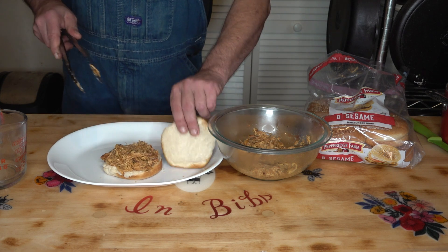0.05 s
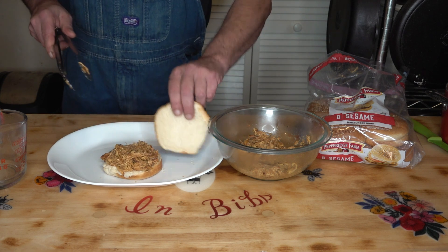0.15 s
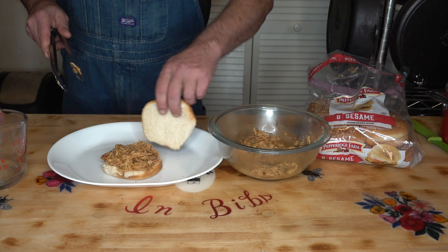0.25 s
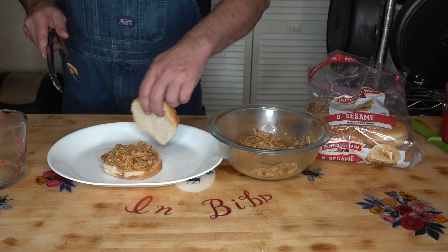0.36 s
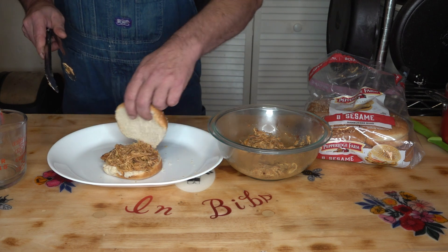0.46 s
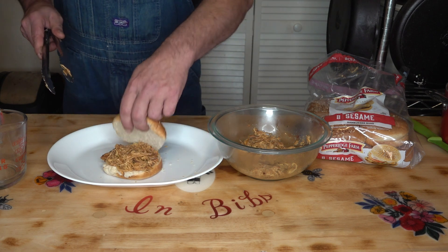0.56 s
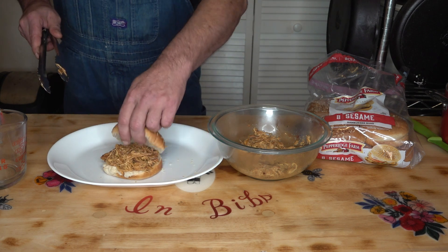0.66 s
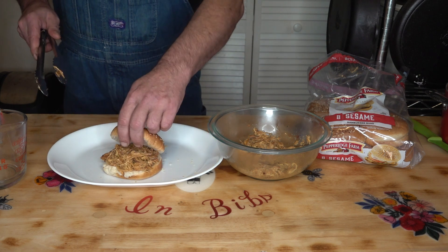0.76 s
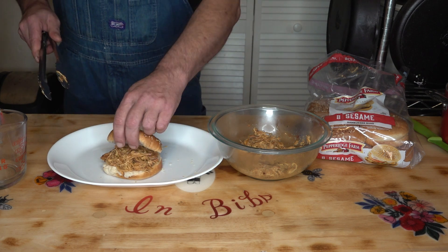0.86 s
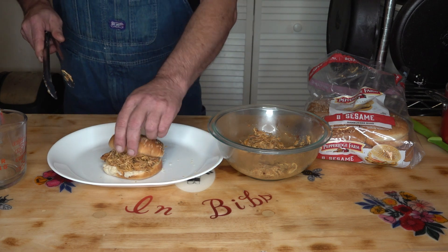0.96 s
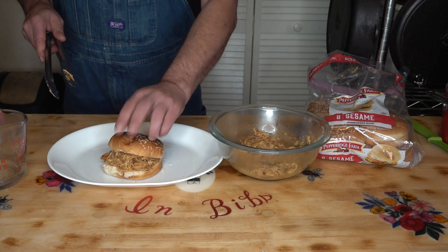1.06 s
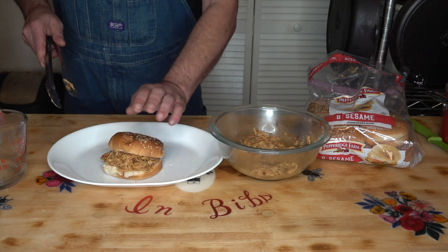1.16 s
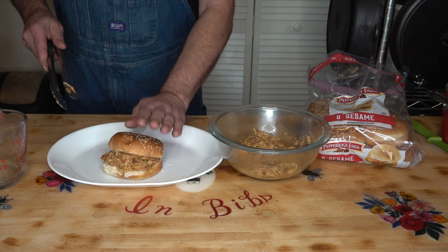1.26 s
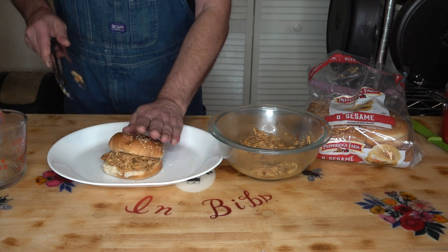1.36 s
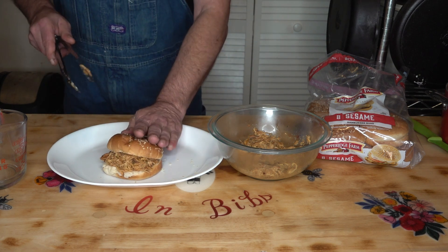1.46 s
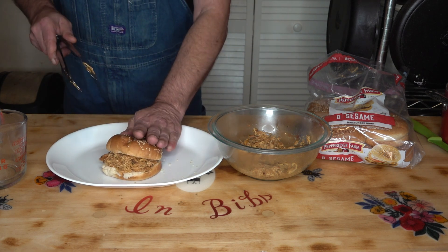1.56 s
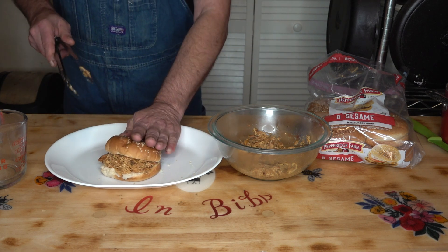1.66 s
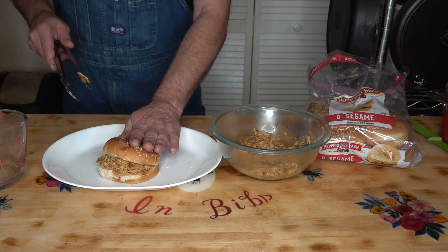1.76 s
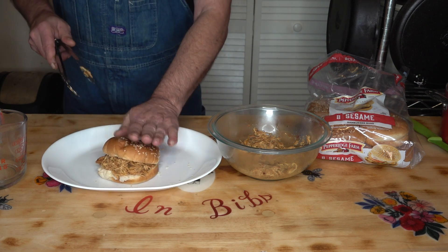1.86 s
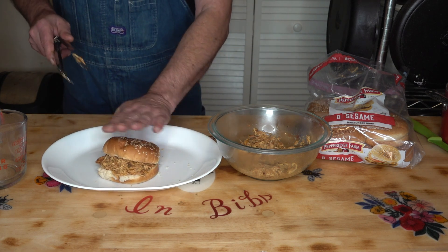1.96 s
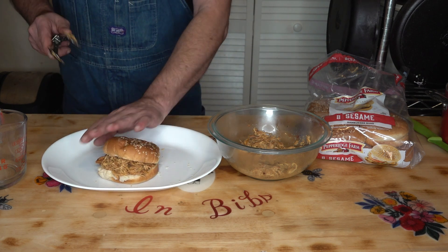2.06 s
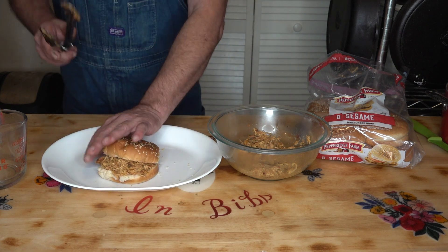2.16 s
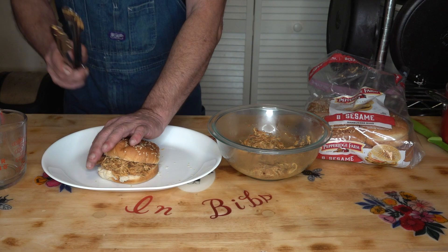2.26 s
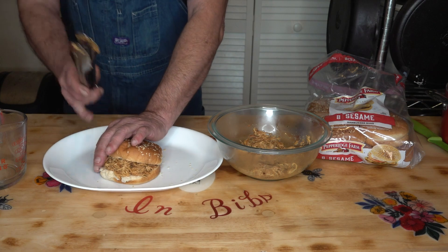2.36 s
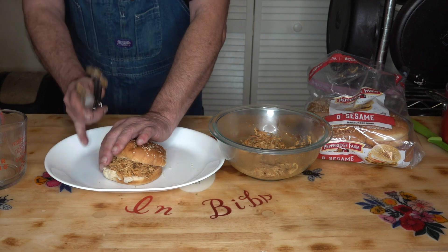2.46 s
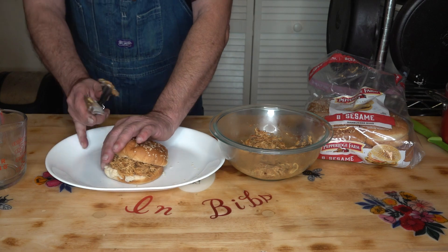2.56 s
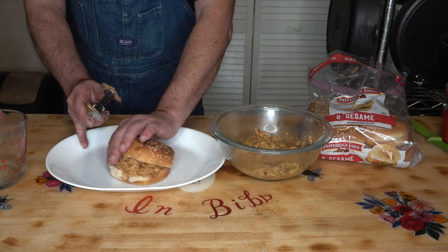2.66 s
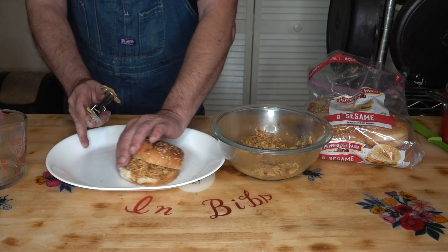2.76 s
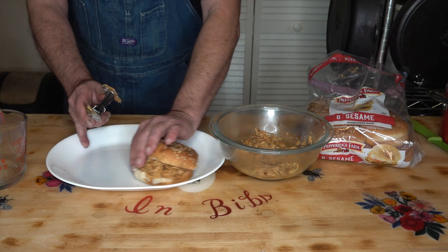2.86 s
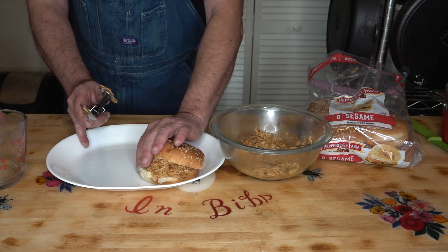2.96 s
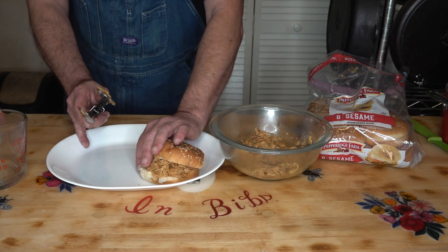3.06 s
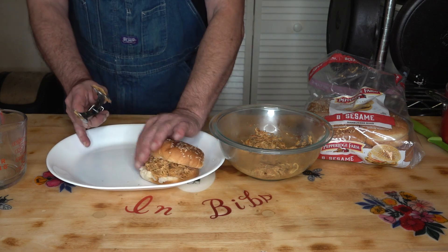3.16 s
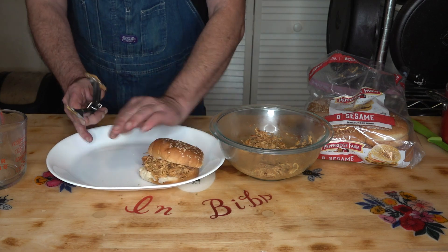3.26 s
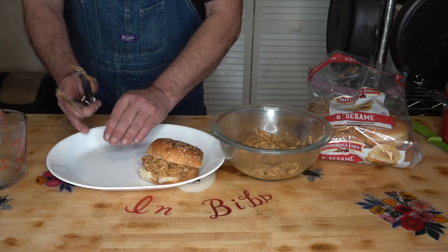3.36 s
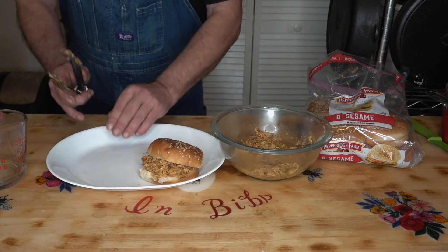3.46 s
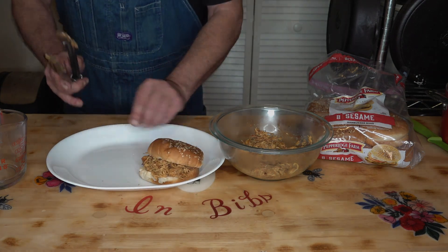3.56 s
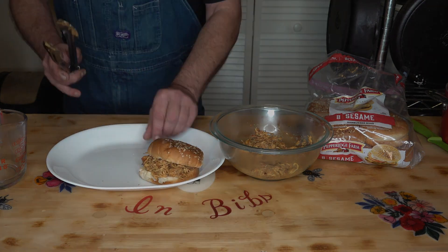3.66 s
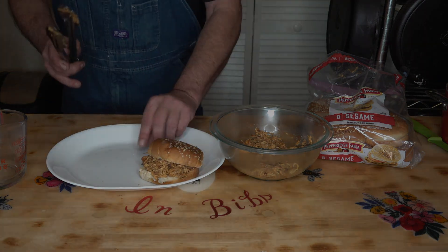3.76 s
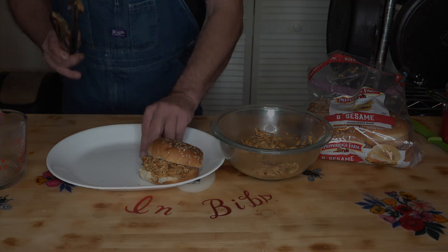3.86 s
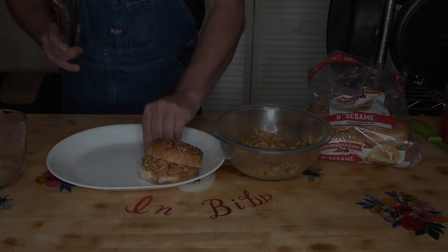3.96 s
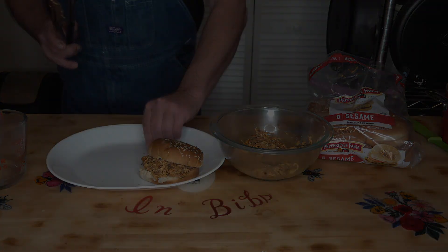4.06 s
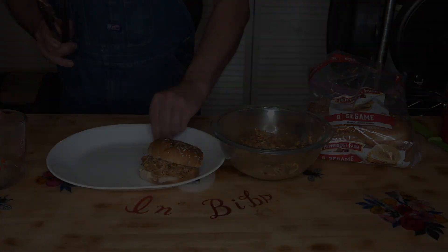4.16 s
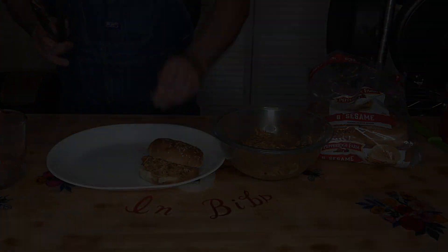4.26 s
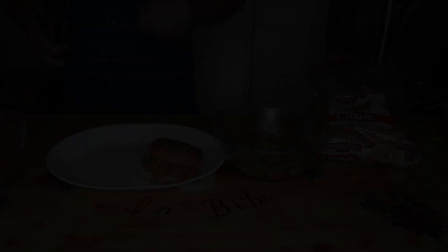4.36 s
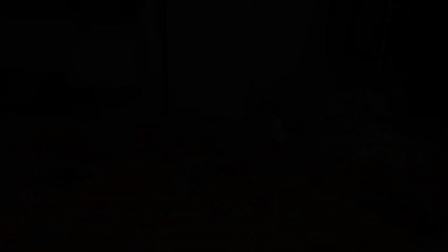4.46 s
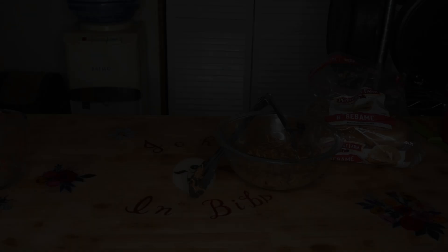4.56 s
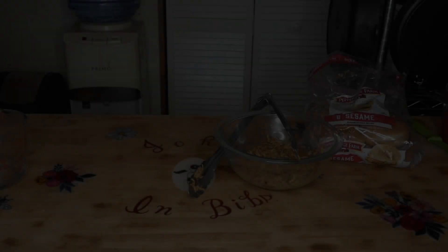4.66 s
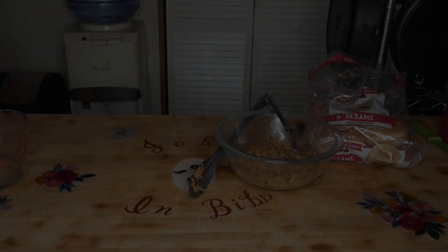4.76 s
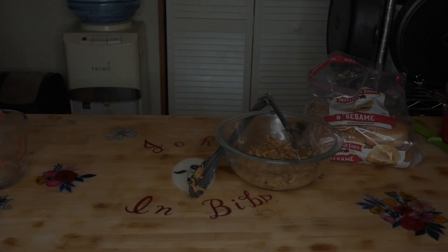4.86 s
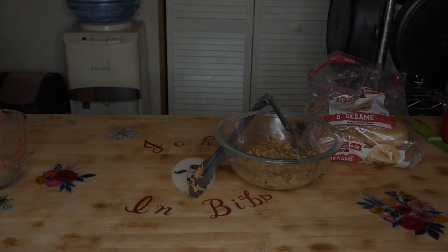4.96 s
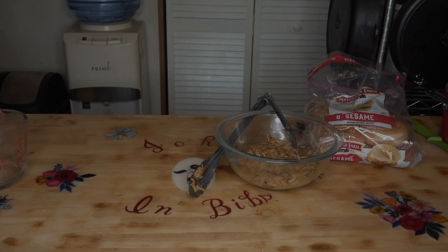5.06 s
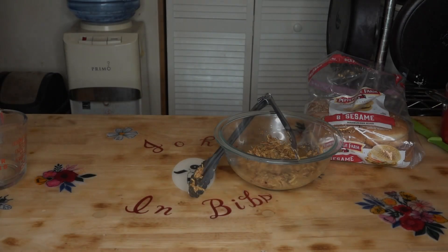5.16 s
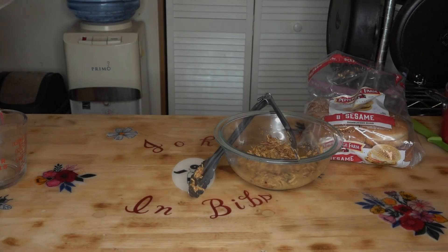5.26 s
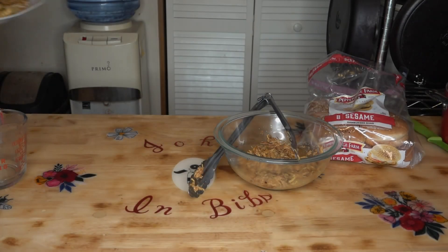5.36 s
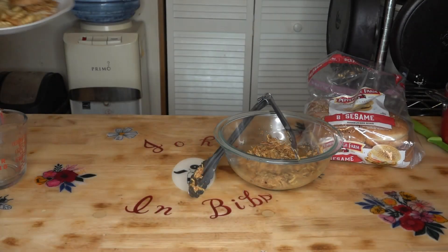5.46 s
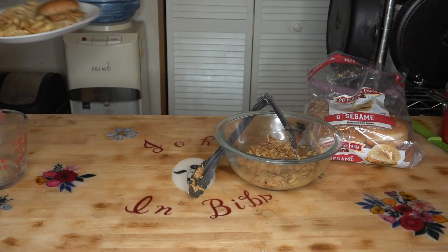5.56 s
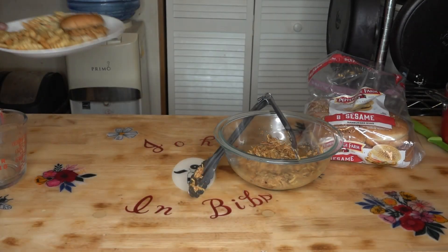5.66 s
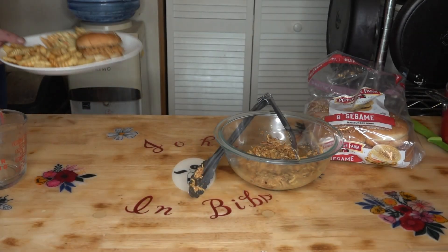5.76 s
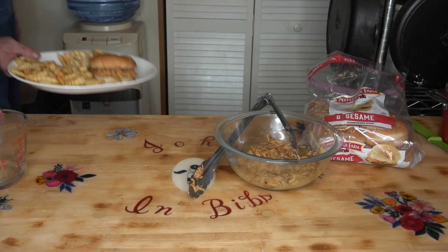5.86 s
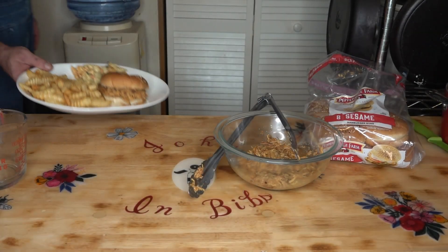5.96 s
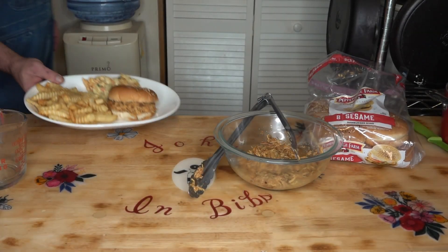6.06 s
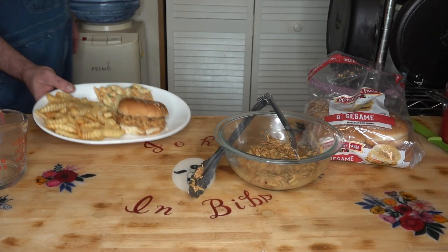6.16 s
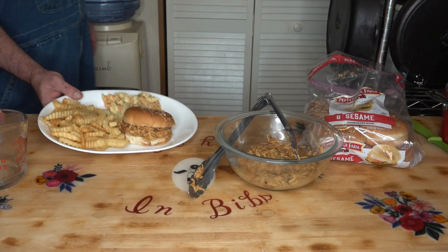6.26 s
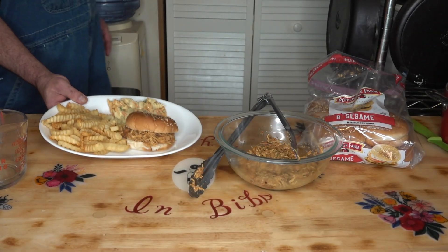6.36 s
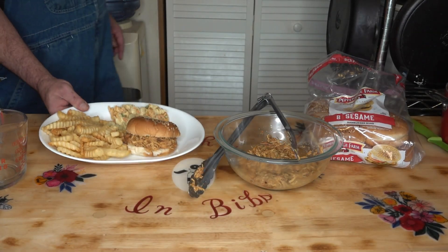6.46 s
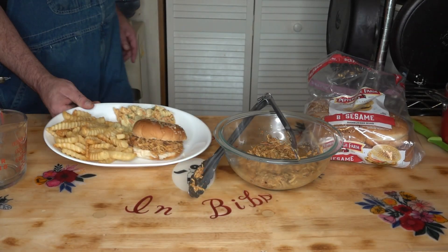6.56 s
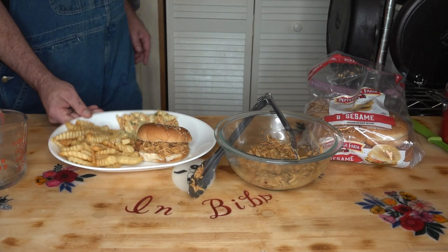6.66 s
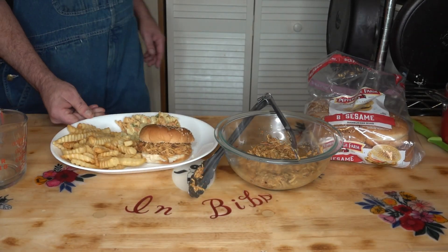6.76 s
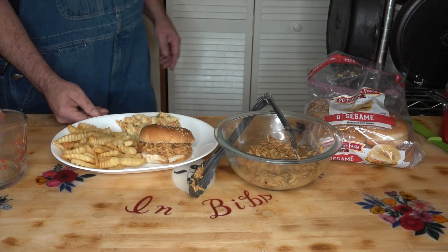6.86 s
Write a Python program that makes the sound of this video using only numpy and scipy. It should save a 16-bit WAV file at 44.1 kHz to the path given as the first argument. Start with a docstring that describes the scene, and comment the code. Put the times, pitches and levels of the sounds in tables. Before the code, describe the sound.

Bread peels off a plate, tongs and china clatter, sound dips, then cloth shuffles in and a loaded plate lands with a hard clunk.

```python
"""In a small kitchen, over air noise and the wavering tones of a motor, a sandwich is plated on a wooden table.
Bread peels in slips; steel tongs knock the table and a china plate rocks on a glass bowl (excited modes).
The level fades out and in; then someone shuffles up in denim (granular friction, soft footfalls).
A full plate is set down: rim first, a wobble, then flat on its foot, with a short drag after each landing.
Contacts share early echoes and a diffuse room tail."""
import sys
import numpy as np
from scipy import signal
from scipy.fft import rfft, irfft
from scipy.io import wavfile
from scipy.ndimage import uniform_filter1d, map_coordinates

SR = 44100
rng = np.random.default_rng(int(sys.argv[2]) if len(sys.argv) > 2 else 0)


def put_to_file(sound):
    """Save the sound as 16-bit audio at rate SR, in the file named by the first command-line argument."""
    columns = np.atleast_2d(sound).T  # one column per channel
    safe = np.clip(columns, -1, 1)
    whole_steps = np.round(safe * 32767)
    wavfile.write(sys.argv[1], SR, whole_steps.astype(np.int16))


N = 304290
TIME = np.arange(N) / SR

# All levels are those ahead of the fade and the rounding of peaks.
# Spectrum of the air noise: [f/Hz, relative density/dB per Hz]
AIR_SPECTRUM = [(25, -24), (53, -17.5), (90, -10), (150, -13), (220, -9), (340, -6), (560, -15),
                (1000, -18), (1550, -24), (2500, -30), (4300, -25.5), (6200, -36.5), (9000, -39.5),
                (15800, -37.5)]
AIR_DB = -52
# Mean lines of the motor: [f/Hz, rms level/dB]
MOTOR_LINES = [(106.8, -55.5), (213, -61), (345, -61)]

# Bun peeling off the plate in runs of slips: [t/s, duration/s, level per slip/dB, f/Hz]
PEELS = [(0.0287, .006, -15.5, 4880), (0.049, .002, -25, 5000), (0.056, .002, -17, 4900),
         (0.063, .003, -11, 4080), (0.074, .008, -9.5, 2040)]
SLIP_EVERY_S = 0.0029   # before the uneven delays
# Small clicks of the tongs' hinge and sticky bread: [t/s, level/dB, f/Hz]
SMALL_CLICKS = [(0.392, -22, 7717), (.897, -38, 5026), (.99, -30, 5540), (1.145, -28, 5800),
                (1.7715, -29.5, 7175), (1.868, -35, 5985), (2.411, -26.5, 6000), (2.717, -26, 2780),
                (3.0461, -32, 4400), (3.894, -35.5, 4500), (3.962, -33.5, 4430), (6.579, -25, 5000)]
CLICK_RING_DB = -15   # the tongs ring faintly with each click
BOUNCE_S, BOUNCE_DB = .00145, -16   # reflection off the table top

# A hand brushing the bun, a hiss trailing the clatter, then the sandwich pushed over the plate:
# [t/s, swell/s, peak level/dB, fall/dB per s, treble against body/dB]
SLIDES = [(1.435, 0.04, -57.5, 120, -5), (2.609, 0.013, -45, 122, -3.5), (2.76, 0.154, -56.5, 198.3, 1.5)]
# Soles and denim scuffing: same columns
SCUFFS = [(4.78, 0.15, -47.5, 150, -5.5), (4.878, 0.044, -36.5, 228, 6), (4.94, 0.065, -38.5, 82, 1.5),
          (5.089, 0.033, -52.5, 307, 15.5), (5.28, 0.046, -46, 112, -19), (5.434, 0.018, -31.5, 99, 0.5),
          (5.46, 0.021, -33, 84, 3), (5.59, 0.0092, -40, 129, -16), (5.67, 0.0088, -50, 90, 10.5),
          (5.78, 0.02, -51, 121, 4.5), (5.844, 0.028, -47, 118, 3.5), (6.034, 0.033, -42.5, 89, 0),
          (6.08, 0.0072, -29, 292, -1.5), (6.134, 0.044, -31, 156, 4), (6.172, 0.0083, -32.5, 350, 2),
          (6.232, 0.019, -37.5, 134, 5.5), (6.625, 0.022, -20, 260, 1), (6.643, .005, -16, 450, 0.5),
          (6.663, 0.005, -19.5, 150, -6), (6.698, 0.011, -22.5, 158, -19), (6.869, 0.0029, -35, 294, 13)]
# Spectrum of friction: [f/Hz, relative density/dB per Hz]
FRICTION_SPECTRUM = [(60, -28), (150, -5.5), (400, -2.5), (700, -7), (1050, -5), (1450, -10), (2200, -10.5),
                     (3000, -10), (4900, -10.5), (6300, -17), (11000, -15.5), (15800, -18.5)]
# Clothes rustle faintly throughout the walk
WALK_FROM_S, RUSTLE_DB, RUSTLE_BRIGHT_DB = 4.5, -58, 3
# The cloth snags now and then as it rubs
SNAGS_PER_S, SNAG_SPREAD_S, SNAG_BAND_HZ, SNAG_DB = 220, .0003, (590, 6600), -8

# Fingers patting the bun: [t/s, level/dB]
PATS = [(1.486, -13), (1.508, -17), (1.533, -18), (1.868, -25), (1.885, -24), (1.905, -25)]
# Colour of a pat: (clack f/Hz, then levels against the clack/dB: thud, crack, tick; room send/dB)
PAT_TOUCH = (748, 2.5, -13.5, -44, 7.5)
# Footfalls: [t/s, level/dB]
FOOTFALLS = [(5.235, -24), (5.4405, 1.5), (5.72, -15.5), (6.081, -11.5), (6.173, -22), (6.6255, 4),
             (6.632, 0.5), (6.646, 0.5), (6.704, 2.5), (6.715, -1.5)]
# Colour of a footfall, the thud being the floor's: same columns as a pat
STEP_TOUCH = (899, 4.5, -16, -34, 1.5)

# Plate's foot knocking dully on the wood:
# [t/s, clack f/Hz, then levels/dB: clack, thud, crack, tick, ring gain, room send gain]
KNOCKS = [(2.2385, 1014, -17, -22, -38, -47, -10, -3), (3.2802, 723, 9.5, -3, -13.5, -56, -1, -2.5),
          (3.2858, 692, 0, -15, -28, -58, -10, -8), (3.9346, 595, -16.5, -22, -34, -62, 6, 1.5),
          (4.2333, 717, 13, -2.5, -10.5, -40, 0, -3), (4.2389, 720, 3, -10, -20, -50, -9, -8)]
# Tongs knocking the table: same columns
TONG_BLOWS = [(2.4595, 1490, 22.5, 11.5, 7.5, -4.5, 6, -1.5),
              (2.6084, 1336, 22.5, 10.5, -1.5, -15, -5, -11.5), (2.6165, 1440, 11.5, 7, -6, -20, -4, -8)]
# Plate rocking against the bowl: same columns
PLATE_BLOWS = [(2.5466, 1420, 16.2, 11.7, 16.5, -14.5, 8, -1.5),
               (2.577, 633, 10.9, 4.9, -8.5, -30, 11, -10.5), (2.624, 430, 12, 14.4, -11, -36, -4, -8.5)]
# Rim of the full plate meeting the table: same columns
RIM_BLOWS = [(6.3108, 1073, 26, 13.5, 15.5, -8.5, -0.5, -2), (6.3135, 1080, 16, -3, 3, -14, -21, -19),
             (6.479, 1700, -9, -30, -20, -30, -7, 2)]
# Full plate wobbling on its edge: same columns
WOBBLES = [(6.452, 750, 0, -17, -30, -42, 4, -4), (6.5005, 760, 8, -16, -22, -40, 2.2, -3),
           (6.555, 750, -2.5, -22, -23, -43, 7.7, 1)]
# Full plate dropping flat on its foot: same columns
FOOT_BLOWS = [(6.7415, 1200, -7, 2, 0, -16, -8, -8), (6.7584, 990, 30, 24, 18.5, -2.5, -1, -4.5),
              (6.7655, 696, 24, 17, -12, -26, -25, -11), (6.7688, 800, 21, 14, -8, -24, -21, -13),
              (6.817, 1250, 8.5, 1, -21, -20, -13, 3.5)]

# Modes of the knocked plate: [f/Hz, gain over the blow/dB, t60/s]
PLATE_FOOT_MODES = [(340, 24.5, 0.088), (446.3, 15, 0.047), (558, 15.5, 0.096), (720, 10, 0.0441),
                    (755, 5.5, 0.041), (990, 12.5, 0.2), (1175, 18.5, 0.1), (1280, 16, 0.063),
                    (1490, 23.5, 0.058), (1563, 19, 0.083), (1764, 11, 0.041), (2196, 13, .12),
                    (2505, 12.5, 0.22), (4080, 10, 0.0082)]
# Modes of the steel tongs, undamped: same columns
TONG_MODES = [(196, 13, .25), (225, 10, .2), (392, 14, .15), (540, 5, .15), (716, 13, .25), (770, 6, .15),
              (980, 11, .21), (1179, 5, .05), (1228, -1, .2), (1300, 3, .08), (1435, 14, .14),
              (1604, 11, .13), (1781, 2, .2), (1850, 4, .07), (1945, 12, .13), (2492, 20, .25),
              (2611, 11, .25), (2790, 9, .12), (3155, 6, .2), (3555, 17.5, .13), (3677, 8, .2),
              (3850, 5, .15), (3930, 12, .22), (4660, 11, .2), (4710, 12, .3), (5416, 11, .24),
              (5539, 17, .22), (5610, 10, .08), (6525, 19, .13), (7214, 17, .08), (7547, 7, .25),
              (7800, 15, .14), (8414, 8, .22), (8720, 9, .25), (9098, 10, .25), (9830, 12, .18),
              (10950, 13, .13), (11360, 13, .08), (11930, 14, .12), (12930, 10, .18)]
# Modes of the china plate and glass bowl, undamped: same columns
PLATE_AND_BOWL_MODES = [(225, 16, .2), (392, 14, .16), (435, 11, .15), (500, 8, .18), (577, 18, .25),
                        (632, 10, .2), (699, 16.5, .25), (922, 6, .22), (980, 11, .25), (1177, 10, .2),
                        (1290, 4, .15), (1448, 4, .18), (1540, 4, .15), (1640, 2, .15), (1850, 2, .2),
                        (1942, 6, .24), (2110, 1, .25), (2481, 24, .4), (2750, 1, .2), (3155, -3, .2),
                        (3300, -4, .25), (3420, -8, .012), (3600, -6, .2), (3850, -5, .1), (4000, -3, .2),
                        (4020, -8, .015), (4595, -5, .25), (5600, -11, .03), (5850, -5, .008)]
# Modes of the wooden top, driven by the blows' room send: same columns
TABLE_MODES = [(222, 8.5, 0.2), (391.4, 5, 0.053), (530, 3, 0.19), (564, 5, 0.4), (640, 1.5, 0.3),
               (702, 6.5, 0.14), (745, -1, .2), (1030, -1.5, 0.072), (1150, 1, 0.12)]
# Modes of the floor under a step: same columns
FLOOR_MODES = [(174, 6, 0.14), (382.6, 13, 0.086), (653.6, 18.5, 0.18), (1250, 18.5, 0.064),
               (1660, 21, 0.047)]
# Modes of the full plate by point of impact: [f/Hz, gain struck on rim/dB, gain struck on foot/dB, t60/s]
FULL_PLATE = [(248, 9, 11, .34), (362, 13, 14, .2), (396, 8, 13, .22), (450, 8, 8, .15), (545, 5, 10, .25),
              (560, 14, 7, .25), (652, 0, 11, .16), (700, 16, 6, .22), (747, 13, 11, .36), (792, 9, 11, .2),
              (847, 13, 2, .25), (912, 11, 9, .18), (960, 11, 11, .18), (1066, 11, 8, .33),
              (1172, 5, 14, .18), (1255, 12, -6, .29), (1342, 14, 5, .08), (1435, 10, 7, .18),
              (1525, 4, 7, .2), (1626, 7, 4, .22), (1778, 16, 10, .21), (1830, 14, 9, .14),
              (1990, 5, 7, .2), (2303, -8, 14, .15), (2640, 8, 11, .08), (2688, 11, 3, .35),
              (2970, 7, -3, .2), (3330, 11, 0, .035), (3650, -8, 7, .08), (4260, 18, 8, .4),
              (4330, 12, 4, .03), (4880, 4, 9, .12), (5050, 4, 7, .03), (5600, 8, 3, .15)]
RIM_MODES = [(hz, db, t60) for hz, db, _, t60 in FULL_PLATE]
FOOT_MODES = [(hz, db, t60) for hz, _, db, t60 in FULL_PLATE]
# A hand steadies the rocking plate and the tongs and damps their ring
STEADY_FROM_S, STEADY_DB_PER_S = 2.628, 650

# Drag of the full plate after each landing: (t/s, peak level/dB, fall/dB per s)
RIM_DRAG, FOOT_DRAG = (6.345, -29.5, 94), (6.78, -31, 109)
DRAG_SWELL_S, DRAG_BAND_HZ, DRAG_RING_DB, DRAG_SLIPS_PER_S = 0.047, (220, 3100), -4, 1300

# Reflections from the nearest surfaces: [delay/s, level/dB]
ECHOES = [(.0021, -16.5), (.00415, -7), (.0051, -17), (.00755, -13.5), (0.0096, -11.5)]
# Colour of the room's tail: [f/Hz, relative level/dB]
ROOM_COLOUR = [(100, 6), (250, 2), (550, 7.5), (900, 3), (1600, 1.5), (3000, -3.5), (5000, -7.5), (8000, 3),
               (15000, 1.5)]
# Decay of the room's tail: [f/Hz, t60/s]
ROOM_T60 = [(150, 0.88), (600, 0.12), (1500, 0.21), (4000, 0.33), (14000, 0.12)]
EVEN_FINE_HZ, EVEN_BROAD_HZ = 12, 170   # smoothing widths for levelling the tail's spectrum
# Fade out and in: [t/s, amplitude factor]
FADE = [(3.72, 0.45), (4.23, 0.098), (4.47, 0.0069), (5.2, 0.31)]
CUTOFF_HZ = 15900


def from_db(db):
    """Decibel law: amplitude from level."""
    return 10 ** (np.asarray(db) / 20)


def rms_one(x):
    """Normalisation to unit mean power."""
    return x / np.sqrt(np.mean(x ** 2) + 1e-20)


def at_hz(points, hz):
    """Linear interpolation of a spectrum on a logarithmic frequency axis."""
    freqs, values = np.transpose(points)
    return np.interp(np.log(hz), np.log(freqs), values)


def band(x, low_hz, high_hz, order=2):
    """Causal band-pass filtering, with band edges kept below the Nyquist limit."""
    edges = np.clip([low_hz, high_hz], 10, [.4 * SR, .47 * SR])
    sos = signal.butter(order, edges, "band", fs=SR, output="sos")
    return signal.sosfilt(sos, x + 1e-18)


def drift(rate):
    """Smooth random modulation: spline through unit-rms noise with `rate` steps per second."""
    steps = rng.standard_normal(8192)
    return rms_one(map_coordinates(steps, [TIME * rate], order=3, mode="mirror"))


def noise_bands(size):
    """Third-octave analysis of white noise: yields (centre f/Hz, slice)."""
    edges = 22 * 2 ** (np.arange(30) / 3)
    white = rng.standard_normal((2, size + SR // 4))   # neighbouring bands use different noise
    for k, (low, high) in enumerate(zip(edges, edges[1:])):
        yield np.sqrt(low * high), band(white[k % 2], low, high)[-size:]


def add(track, s, sound):
    """Linear superposition of a sound on a track at time s."""
    start = round(s * SR)
    track[start:start + len(sound)] += sound[:N - start]


def resonance(x, hz, t60):
    """Damped harmonic oscillator: one mode, with unit gain at resonance."""
    r = from_db(-60 / (t60 * SR))
    zeros = np.array([1, 0, -1]) * (1 - r * r) / 2
    poles = [1, -2 * r * np.cos(2 * np.pi * hz / SR), r * r]
    return signal.lfilter(zeros, poles, x + 1e-18)


def ringing_of(x, modes):
    """Modal superposition: the response of a body's modes to the excitation x."""
    return sum(from_db(db) * resonance(x, hz, t60) for hz, db, t60 in modes)


def disperse(x, spread_s):
    """All-pass dispersion: bending waves and micro-bounces spread a contact without colouring it."""
    w, hold = 2 * np.pi * np.fft.rfftfreq(len(x)), .5
    spectrum = rfft(x)
    for ratio in (1, np.sqrt(3), np.e):
        delay = np.exp(-1j * w * round(spread_s * ratio * SR))
        spectrum = spectrum * (hold + delay) / (1 + hold * delay)
    return irfft(spectrum, len(x))


def background(waver_db=1.5, waver_rad=0.4, wander_db=0.58):
    """Steady noise and line spectrum: air wandering in colour, motor lines wavering in level and phase."""
    air = rms_one(sum(from_db(at_hz(AIR_SPECTRUM, hz) + wander_db * drift(3)) * noise
                      for hz, noise in noise_bands(N)))
    motor = np.zeros(N)
    for hz, db in MOTOR_LINES:
        level = from_db(db + waver_db * drift(8.2))
        phase = 2 * np.pi * hz * TIME + waver_rad * drift(18)
        motor += level * np.sqrt(2) * np.sin(phase)
    return from_db(AIR_DB) * air + motor


def peeling():
    """Stick-slip release: each run breaks into unevenly spaced slips [t/s, level/dB, f/Hz]."""
    slips = []
    for s, length_s, db, hz in PEELS:
        late = rng.uniform(0, .5, 32)   # in slip intervals
        slips += [(s + SLIP_EVERY_S * (k + late[k]), db, hz)
                  for k in range(len(late)) if k * SLIP_EVERY_S < length_s]
    return slips


def ticks(rows, decay_s, width):
    """Impulsive slip noise: tiny rasps that swell and die within a few milliseconds."""
    out, t = np.zeros(N), TIME[:SR // 20]
    for s, db, hz in rows:
        burst = rng.standard_normal(len(t)) * t * np.exp(-t / decay_s)
        add(out, s, from_db(db) * band(burst / np.linalg.norm(burst), hz / width, hz * width))
    return out


def bounce(x):
    """Comb filtering: sound meets its bounce off the table, scaled to keep the mean power about the same."""
    gain = from_db(BOUNCE_DB)
    return (x + gain * np.interp(TIME - BOUNCE_S, TIME, x)) / np.sqrt(1 + gain ** 2)


def stroke(s, swell_s, db, fall_db_per_s):
    """Friction envelope: linear swell to a peak, then exponential decay."""
    fall_db = fall_db_per_s * np.maximum(TIME - s - swell_s, 0)
    return np.clip((TIME - s) / swell_s, 0, 1) * from_db(db - fall_db)


def shuffle(grain_db=0.96, flicker_db=1.3, patchy_db=2.0):
    """Granular friction: dense little catches of shifting colour, with a treble share set for each stroke."""
    rubs = [(stroke(*shape), bright_db) for *shape, bright_db in SCUFFS + SLIDES]
    rubs.append(((TIME > WALK_FROM_S) * from_db(RUSTLE_DB), RUSTLE_BRIGHT_DB))
    # independent rubs add in power
    body = np.sqrt(sum(level ** 2 for level, _ in rubs))
    treble = np.sqrt(sum((level * from_db(bright_db)) ** 2 for level, bright_db in rubs))
    hiss = rms_one(sum(from_db(at_hz(FRICTION_SPECTRUM, hz) + patchy_db * drift(70)) * noise
                       for hz, noise in noise_bands(N)))
    # coarse threads let go with a crackle
    snags = (rng.random(N) < SNAGS_PER_S / SR) * rng.standard_normal(N)
    crackle = rms_one(band(disperse(snags, SNAG_SPREAD_S), *SNAG_BAND_HZ))
    hiss = hiss + from_db(SNAG_DB) * crackle
    dull = signal.sosfilt(signal.butter(1, 4500, fs=SR, output="sos"), hiss)
    catches = from_db(grain_db * drift(500) + flicker_db * drift(60))
    return catches * (body * dull + treble * (hiss - dull))


def soft_blows(rows, touch):
    """Similarity of contacts: blows of differing strength share one spectral touch."""
    hz, thud_db, crack_db, tick_db, room_db = touch
    return [(s, hz, db, db + thud_db, db + crack_db, db + tick_db, 0, room_db) for s, db in rows]


def blows(rows, modes, spread_s, clack_width, thud_hz, crack_hz,
          ring_wet_db=-13, crack_wet_db=-1, damping=1):
    """Impulse excitation: a short contact pulse drives the modes; returns direct sound and room send."""
    direct, to_room, rings = np.zeros((3, N))
    click = disperse(signal.unit_impulse(SR // 2), spread_s)
    for s, clack_hz, clack_db, thud_db, crack_db, tick_db, ring_db, room_db in rows:
        body = -from_db(clack_db) * band(click, clack_hz / clack_width, clack_hz * clack_width)
        body += from_db(thud_db) * band(click, *thud_hz)               # the struck surface gives way
        body += from_db(tick_db) * band(click, 2000, 21000, order=1)
        crack = from_db(crack_db) * band(click, *crack_hz, order=4)    # hard edges meet
        add(direct, s, body + crack)
        if modes:
            add(rings, s, from_db(ring_db) * ringing_of(body + crack, modes))
        add(to_room, s, from_db(room_db) * (body + from_db(crack_wet_db) * crack))
    rings = damping * rings
    return direct + rings, to_room + from_db(ring_wet_db) * rings


def echoes(x):
    """Early reflections: a few distinct delayed copies from the nearest surfaces."""
    out = np.zeros(N)
    for delay_s, db in ECHOES:
        add(out, delay_s, from_db(db) * x)
    return out


def diffuse(response):
    """Diffuse-field levelling: evens chance spectral peaks and dips so the tail favours no single note."""
    size = 4 * len(response)
    spectrum = rfft(response, size)
    fine, broad = (uniform_filter1d(abs(spectrum) ** 2, round(hz * size / SR))
                   for hz in (EVEN_FINE_HZ, EVEN_BROAD_HZ))
    levelled = spectrum * np.sqrt((abs(broad) + 1e-9) / (abs(fine) + 1e-9))
    return irfft(levelled, size)[:len(response)]


def kitchen(x, first_echo_s=0.0013, build_s=0.00014):
    """Reverberant decay: dense reflections from table and walls, dying at their own rate in each band."""
    t, response = TIME[:SR // 2], 0
    onset = 1 - np.exp(-np.maximum(t - first_echo_s, 0) / build_s)
    for hz, noise in noise_bands(len(t)):
        tail = noise * onset * from_db(-60 * t / at_hz(ROOM_T60, hz))
        share = 2 * hz * (2 ** (1 / 6) - 2 ** (-1 / 6)) / SR   # bandwidth over the whole spectrum
        level = from_db(at_hz(ROOM_COLOUR, hz)) * np.sqrt(share)
        response = response + level * tail / np.linalg.norm(tail)
    return signal.fftconvolve(x, diffuse(response))[:N]


def plate_drag(drag, modes, grain_db=4):
    """Stick-slip excitation: unglazed china catches on wood in uneven slips that keep the plate ringing."""
    strength = from_db(grain_db * np.minimum(rng.exponential(1, N), 2))
    slips = (rng.random(N) < DRAG_SLIPS_PER_S / SR) * rng.choice([-1, 1], N) * strength
    grating = band(slips, *DRAG_BAND_HZ)
    ringing = from_db(DRAG_RING_DB) * ringing_of(grating, modes)
    s, db, fall = drag
    return rms_one(grating + ringing) * stroke(s, DRAG_SWELL_S, db, fall)


def scene():
    """Superposition: contacts share table modes or floor and one room; friction and background lie beneath."""
    clicks = ticks(SMALL_CLICKS, decay_s=0.00096, width=2.7)
    click_ring = from_db(CLICK_RING_DB) * ringing_of(clicks, TONG_MODES)
    small = bounce(clicks + click_ring + ticks(peeling(), decay_s=0.00068, width=2.25))
    steadied = from_db(-STEADY_DB_PER_S * np.maximum(TIME - STEADY_FROM_S, 0))
    struck = [
        blows(soft_blows(PATS, PAT_TOUCH), [], spread_s=.0003, clack_width=1.48,
              thud_hz=(220, 550), crack_hz=(2000, 5000)),
        blows(KNOCKS, PLATE_FOOT_MODES, spread_s=0.00019, clack_width=1.25,
              thud_hz=(330, 600), crack_hz=(1400, 4600), ring_wet_db=-19.5, crack_wet_db=1.0),
        blows(TONG_BLOWS, TONG_MODES, spread_s=.00014, clack_width=1.282, thud_hz=(260, 950),
              crack_hz=(2900, 5400), ring_wet_db=-14.5, crack_wet_db=-0.5, damping=steadied),
        blows(PLATE_BLOWS, PLATE_AND_BOWL_MODES, spread_s=0.0001, clack_width=1.616, thud_hz=(400, 780),
              crack_hz=(2600, 6000), ring_wet_db=-19, crack_wet_db=-6.5, damping=steadied),
        blows(RIM_BLOWS, RIM_MODES, spread_s=0.00023, clack_width=1.43,
              thud_hz=(290, 620), crack_hz=(1500, 5200), ring_wet_db=-15.5, crack_wet_db=2.5),
        blows(WOBBLES, FOOT_MODES, spread_s=0.00031, clack_width=1.195,
              thud_hz=(200, 600), crack_hz=(1200, 4500), ring_wet_db=-16, crack_wet_db=-1),
        blows(FOOT_BLOWS, FOOT_MODES, spread_s=.0003, clack_width=1.41,
              thud_hz=(250, 600), crack_hz=(1500, 5200), ring_wet_db=-19, crack_wet_db=0.5)]
    direct, to_room = np.sum(struck, axis=0)
    table = ringing_of(to_room, TABLE_MODES)
    steps, steps_to_room = blows(soft_blows(FOOTFALLS, STEP_TOUCH), FLOOR_MODES, spread_s=.0004,
                                 clack_width=1.5, thud_hz=(140, 520), crack_hz=(2000, 5000))
    dragging = plate_drag(RIM_DRAG, RIM_MODES) + plate_drag(FOOT_DRAG, FOOT_MODES)
    to_room = to_room + steps_to_room + from_db(-6) * small
    room = echoes(to_room) + from_db(4.5) * kitchen(to_room)
    contacts = direct + table + steps + small + room
    return (contacts + bounce(shuffle()) + dragging + background())[None]


def record(dry, top=0.93, low_cut_hz=60):
    """Saturation and band limiting: level fades out and in, peaks are rounded, deep bass and top are cut."""
    fade = np.interp(TIME, *np.transpose(FADE))
    rounded = top * np.tanh(dry * fade / top)
    lean = signal.sosfilt(signal.butter(3, low_cut_hz, "high", fs=SR, output="sos"), rounded)
    return signal.sosfilt(signal.ellip(10, .1, 80, CUTOFF_HZ, fs=SR, output="sos"), lean)


dry = scene()
out = record(dry)
put_to_file(out)
```